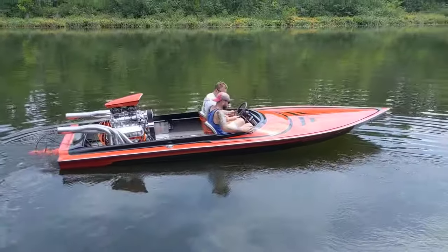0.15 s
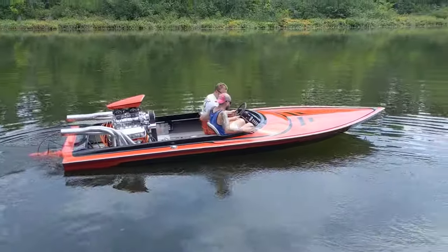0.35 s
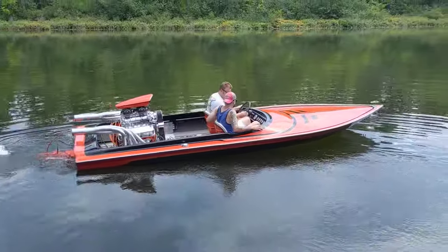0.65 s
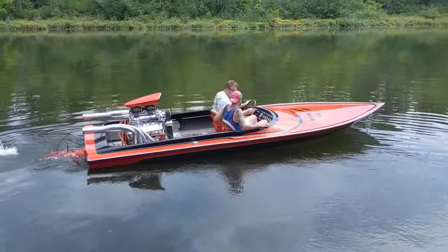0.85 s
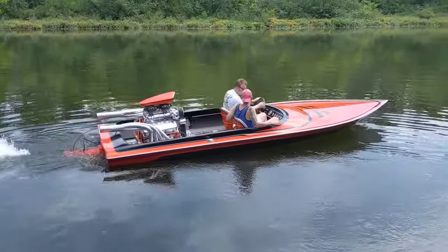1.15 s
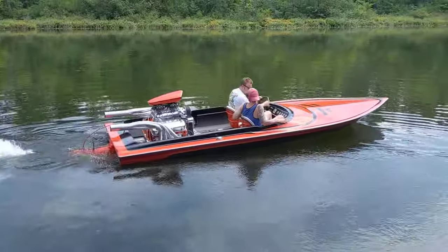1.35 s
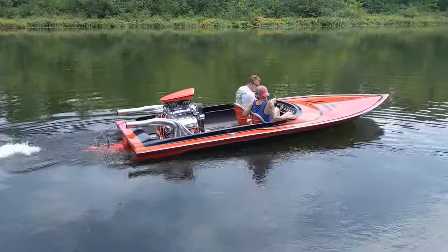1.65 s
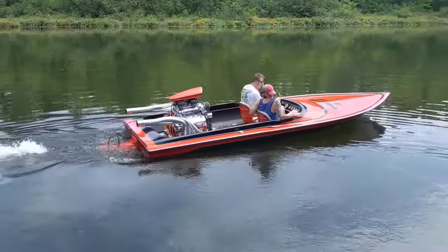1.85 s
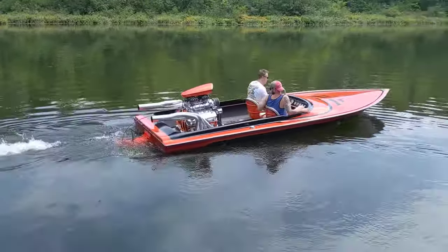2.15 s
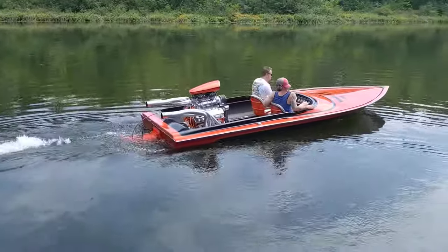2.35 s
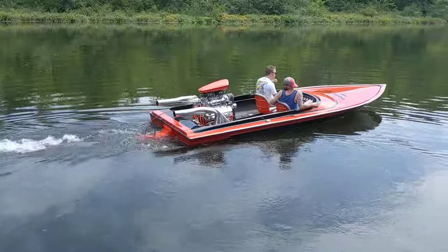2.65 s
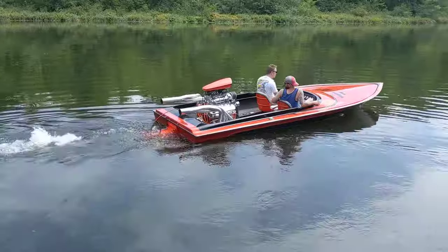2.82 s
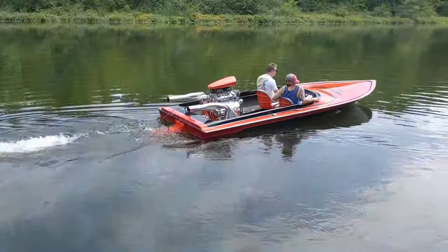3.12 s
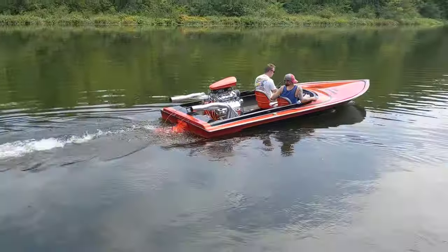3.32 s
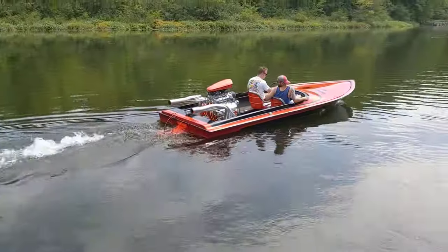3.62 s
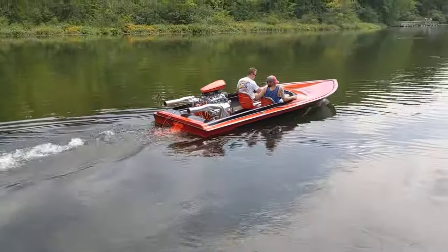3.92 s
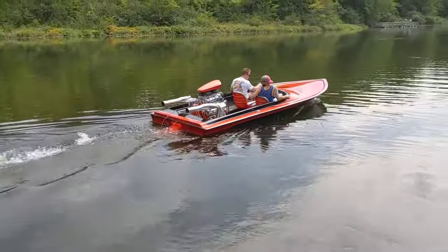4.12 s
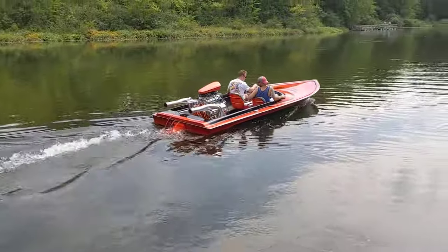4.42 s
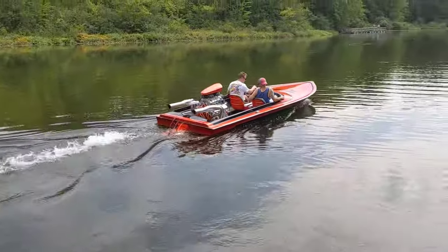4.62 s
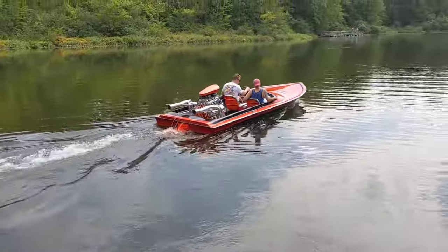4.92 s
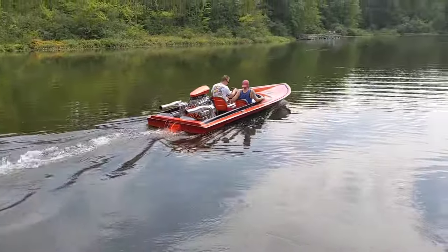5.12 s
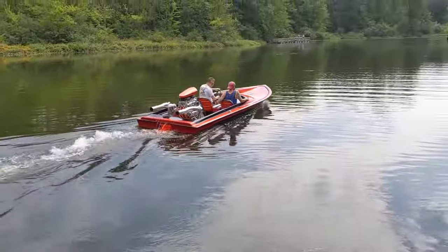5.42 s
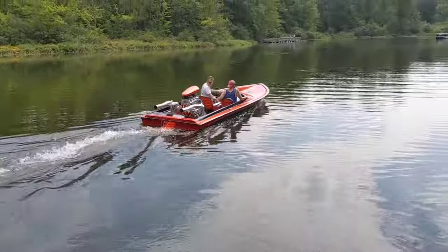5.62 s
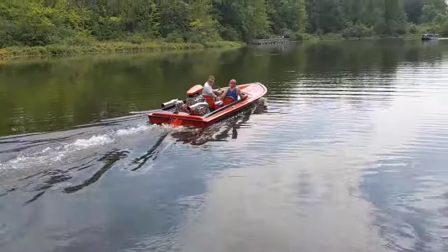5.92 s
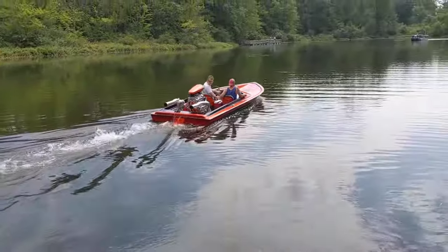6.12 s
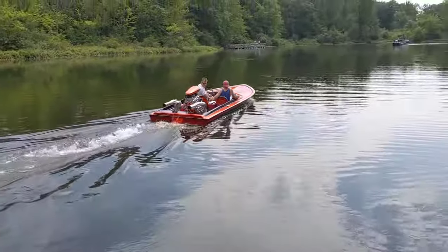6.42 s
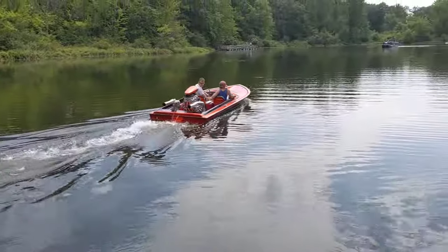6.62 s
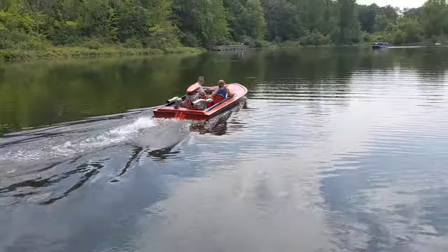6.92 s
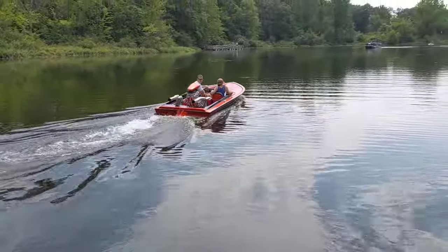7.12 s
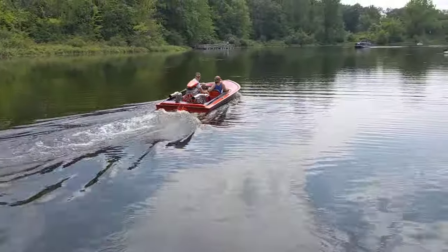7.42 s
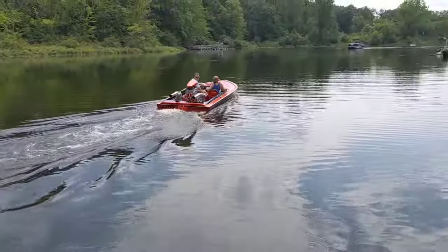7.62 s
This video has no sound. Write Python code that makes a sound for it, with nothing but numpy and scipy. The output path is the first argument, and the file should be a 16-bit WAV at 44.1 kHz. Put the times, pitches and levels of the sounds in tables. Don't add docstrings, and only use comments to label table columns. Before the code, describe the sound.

A powerful eight-cylinder speedboat engine idles throughout, already running at the start. Deep uneven hum and fast barking pops from open pipes, each with a raspy puff of gas. Speed wavers slightly but never revs up. As the stern swings toward the listener the tone changes and the cracks become harder and more frequent. Water jet washes beneath. Stereo pickup from the shore, open air, faint short echo from trees.

```python
import sys
import numpy as np
from scipy import signal
from scipy.fft import rfft, irfft, next_fast_len
from scipy.io import wavfile
from scipy.ndimage import uniform_filter1d, map_coordinates

SR = 44100
rng = np.random.default_rng(int(sys.argv[2]) if len(sys.argv) > 2 else 0)


def rack_gain(trim_db):
    fader = np.asarray(trim_db, float)
    return 10 ** (fader / 20)


def dump(signal):
    limited = np.clip(np.atleast_2d(signal).T, -1, 1)
    pcm = np.round(limited * 32767).astype(np.int16)
    wavfile.write(sys.argv[1], SR, pcm)


N = 342216

# time in seconds, firing rate in firings per second.
ENGINE_SPEED = [(0.0, 84.43), (0.38, 87.74), (0.55, 85.3), (0.95, 87.1), (1.43, 85.17), (1.66, 87.82),
                (2.47, 85.59), (2.69, 90.77), (3.15, 85.5), (3.46, 88.2), (3.68, 86.94), (4.65, 86.41),
                (4.75, 87.5), (5.64, 86.61), (5.86, 89.83), (6.06, 85.99), (6.75, 87.77), (7.76, 87.35)]
# multiple of the four-stroke cycle, level side-on in dB, level stern-on in dB.
CRANK_ORDERS = [(3, -51, -48), (4, -40, -61), (5, -21.5, -31), (6, -32.5, -32.5), (7, -29, -30.5),
                (7.96, -16, -17.5), (9, -37.5, -33), (10, -43, -43.5), (11, -33, -38), (12, -30.5, -41),
                (13, -43.5, -40.5), (14, -42.5, -35.5), (15, -31.5, -43), (16, -40.5, -42), (17, -36, -41),
                (18, -38.5, -43), (19, -32.5, -37), (20, -29.5, -33.5), (21, -19, -19.5), (22, -31, -36),
                (23, -52, -40.5), (24, -62, -36.5), (25, -38.5, -40), (26, -41, -40), (27, -47.5, -51.5),
                (28, -43, -57), (29, -57, -64), (30, -43.5, -50.5)]
# push in dB, push lag in firings, crack in dB, crack lag in firings.
CYLINDERS = [(4.9, .32, -2, .04), (.9, .22, -1, -.06), (.8, .74, -1, .13), (3, .65, -2, .13),
             (-10.9, .57, 1, -.06), (.5, .62, 0, .07), (1.6, .51, 1, -.06), (-.9, .43, -1, .01)]
# bark side-on in dB, bark stern-on in dB,
# mouth tone side-on in Hz, quarter-on in Hz, stern-on in Hz.
PIPES = [(-6, -5, 7500, 5700, 5500), (-3, -4, 3200, 7600, 2950), (-2, -8, 2700, 2700, 4500),
         (-7, -11, 5000, 9000, 8800), (-8, -4, 5000, 5500, 5500), (0, -11, 4000, 2700, 5300),
         (-9, 0, 9500, 3600, 4100), (-9, 0, 4500, 5500, 2700)]
BARK_LAG = [0, -.25, -.2, -.08, -.28, -.4, -.3, -.32]
# time in seconds, peak level in dB.
HARD_FIRINGS = [(2.0504, -14.5), (2.6391, -16), (2.7848, -15.5), (3.2078, -17), (4.3108, -16.5),
                (5.2083, -15), (5.3918, -17.5), (5.4846, -17.5), (5.5764, -21), (5.6468, -16),
                (5.8154, -15), (6.0314, -18.5), (6.0888, -16), (6.1237, -15), (6.1816, -15.5), (6.217, -16),
                (6.3217, -13.5), (6.4574, -13.5), (6.4928, -13.5), (6.5851, -17), (6.7907, -15),
                (6.8585, -16), (7.0416, -14), (7.4986, -13.5), (7.5544, -17), (7.5894, -13.5)]
# time in seconds, level in dB.
GAS_FLOW = [(0, -31), (1, -31.5), (2, -29.5), (3.2, -27.5), (4.3, -27.5), (5.2, -25.5), (5.72, -26.5),
            (5.85, -23.5), (6.45, -25.5), (6.8, -26), (7.76, -27)]
# time in seconds, stern-on share 0-1, quarter-on share 0-1.
HEADING = [
    (0, 0.01, 0),
    (1.5, .08, 0.14),
    (2.4, 0.18, 0.95),
    (3.5, 0.34, 0.9),
    (4.5, 0.85, 0.7),
    (5.5, 0.97, 0.38),
    (7.76, 0.95, 0.42),
]
# centre in Hz, width in Hz, level in dB.
PIPE_SIDE = [(412, 40, 3), (600, 40, -9), (700, 60, -7), (1047, 250, -9), (1660, 150, -21)]
PIPE_STERN = [(423, 33, -16.5), (595, 55, -6), (712, 36, 4), (810, 70, -7), (1840, 330, -24)]
# centre in Hz, width in Hz, level in dB.
MOUTH_SIDE = [(2490, 310, -8.5), (4010, 75, -2.5), (4720, 120, -1), (5840, 140, 14.5), (7420, 270, -3),
              (9610, 310, 2)]
MOUTH_STERN = [(2240, 360, 0.5), (4470, 246, 8.5), (5350, 260, -4.5), (6190, 360, 1.5), (8290, 210, -1),
               (9440, 290, -1.5), (10670, 190, -3), (11500, 260, -5)]
# frequency in Hz, level in dB per Hz.
GAS_SIDE = [(1060, -13), (1800, -9), (2240, -15), (2600, -4.5), (4430, 2.5), (4860, -2.5), (6580, -25),
            (7550, 2.5), (8200, -5), (14200, -13), (16200, -32)]
GAS_STERN = [(1060, -25), (1800, -15.5), (2090, -21), (2480, -0.5), (3950, -12), (4860, -10.5), (5380, -1),
             (6890, -8.5), (9950, -5.5), (14400, -4), (16200, -19)]
# frequency in Hz, gain in dB.
QUARTER_COLOUR = [(420, -1.5), (760, -6), (1100, -1), (1700, 7), (2200, -3), (3200, -2.5), (4150, -3.5),
                  (5600, -1.5), (6600, -5.5), (7500, 1.5), (12500, -2.5)]
# frequency in Hz, level in dB per Hz.
WASH_SIDE = [(180, -29), (300, -12), (370, -4), (433, -3.5), (500, -4), (703, -10.5), (1300, -11),
             (1900, -18.5), (4260, -13.5), (6580, -15.5), (7390, -17.5), (9500, -17.5), (14200, -26),
             (15400, -25), (16200, -92)]
WASH_STERN = [(180, -33), (300, 2), (487, -13.5), (715, 1), (903, -6.5), (1370, -24), (2080, -16.5),
              (2500, -3), (3320, -12), (4870, -26), (5380, -16.5), (7030, -29.5), (9980, -39.5),
              (13700, -45), (16200, -60)]
# frequency in Hz, level in dB per Hz.
HULL_RUMBLE = [(20, -21), (42, -6), (60, 10), (100, -18), (230, 10), (320, -22), (500, -43)]
# frequency in Hz, time to fall 60 dB in seconds.
SHORE_DECAY = [(200, 0.42), (2000, 0.13), (10000, 0.066)]
# frequency in Hz, left minus right in dB.
BALANCE_SIDE = [(60, 0.5), (92, 2), (140, -3), (210, 3), (330, 6), (500, 10.5), (770, 7.5), (1170, 7),
                (1790, 7.5), (2740, -0.5), (4190, 4), (6410, 8), (9810, 7.5), (15000, -1)]
BALANCE_STERN = [(60, 1.5), (92, -4), (140, -5), (210, 3.0), (330, -7), (500, 15), (770, 3.5), (1170, 7),
                 (1790, -1.5), (2740, 1), (4190, 4), (6410, 8), (9810, 4.0), (15000, -3)]
# frequency in Hz, phase in radians.
LEFT_LEADS = [(55, 0), (87, -0.5), (230, -1), (600, -1.4), (1000, -0.5), (1380, 1.74), (1720, 0.36),
              (3450, 1), (4130, -2.5), (5250, 0.5), (6030, 3), (9000, 5.5), (16000, 8)]
# frequency in Hz, likeness 0-1.
LIKENESS = [(60, .99), (500, 0.72), (1000, 1), (2000, 1), (4000, 0.33), (8000, 0.3), (14000, 0)]

BOOM_HZ, BOOM_WIDTH_HZ, BOOM_FLOOR = 229, 12, .04
LOPE_DB_PER_HZ = .9
STEP = 8
BARK_SIDE_DB, BARK_STERN_DB, BARK_HALFWAY_DB = -1.5, -6, -3.5
TONE_DB, TONE_WIDTH_HZ = 9, 330
TOP, KNEE = .9, 5


def firings():
    first_firing = -.28
    return first_firing + np.cumsum(curves(ENGINE_SPEED)[0]) / SR


def hum():
    push_db, lag = np.transpose(CYLINDERS)[:2]
    cycle = 2 * np.pi * firings()[::STEP] / 8
    rate = curves(ENGINE_SPEED)[0][::STEP] / 8
    mean_rate = rate.mean()
    share = stern_share()[::STEP]
    push_at = np.arange(8) + lag

    def boom(f):
        return BOOM_FLOOR + 1 / (1 + 2j * (f - BOOM_HZ) / BOOM_WIDTH_HZ)

    out = 0
    for k, side_db, stern_db in CRANK_ORDERS:
        k = round(k)
        train = -np.sum(rack_gain(push_db) * np.exp(-2j * np.pi * k * push_at / 8))
        weak = np.clip((-15 - side_db) / 25, .1, 1)
        lope_db = (k < 8) * LOPE_DB_PER_HZ * 8 * (rate - mean_rate)
        db = side_db + share * (stern_db - side_db) + lope_db + 2.8 * weak * wobble(6)[::STEP]
        angle = k * cycle + np.angle(train) + 0.44 * weak * wobble(5.8)[::STEP]
        pair = ports(k * mean_rate, BALANCE_SIDE)[:, None]
        slide = (boom(k * rate) / boom(k * mean_rate)) ** (1.94 * weak)
        tone = rack_gain(db) * np.exp(1j * angle) * slide
        out = out + np.sqrt(2) * (pair * tone).real / abs(pair.mean())
    return signal.resample_poly(out, STEP, 1, axis=1)[:, :N]


def pulses(lag, db, jitter, scatter_db, pop_db):
    count = firings()
    n = np.arange(int(count[-1]) - 1)
    chance = rng.standard_normal((len(n), 2))
    at = np.interp(n + lag[n % 8] + jitter * chance[:, 0], count, np.arange(N))
    size_db = db[n % 8] + scatter_db * np.clip(chance[:, 1], -2.5, 1.2)
    mean_peak_db = np.mean(HARD_FIRINGS, 0)[1]
    for s, peak_db in HARD_FIRINGS:
        size_db[np.argmin(abs(at - s * SR))] = pop_db + peak_db - mean_peak_db
    return np.bincount(at.astype(int), rack_gain(size_db), N)


def bark():
    lag, share = np.array(BARK_LAG), stern_share()
    side, stern = [unit(pulses(lag, db, jitter=.012, scatter_db=1.2, pop_db=-5))
                   for db in np.transpose(PIPES)[:2]]
    push = filtered((1 - share) * side + share * stern, lambda f: 1 / (1 + 1j * f / 700) ** 2)
    decay = rack_gain(-60 * np.arange(1500) / SR / 0.045)
    puff = signal.fftconvolve(push, decay)[:N]
    drive = unit(push) + .75 * unit(puff) * noise_pair()
    ring = turned(drive, lambda f: modes(PIPE_SIDE, f), lambda f: modes(PIPE_STERN, f))
    aim_db = BARK_SIDE_DB + share * (BARK_STERN_DB - BARK_SIDE_DB)
    aim_db = aim_db + BARK_HALFWAY_DB * np.sin(np.pi * share)
    return rack_gain(curves(GAS_FLOW)[0] + aim_db) * ring


def cracks():
    db, lag = np.transpose(CYLINDERS)[2:]
    t = np.arange(1500) / SR
    burst = (1 - np.exp(-(t / 0.00082) ** 2)) * rack_gain(-60 * t / 0.028)
    train = pulses(lag, db, jitter=0.021, scatter_db=1.5, pop_db=4.0)
    gate = signal.fftconvolve(train, burst)[:N]
    puffs = patched(gate * noise_pair(), size=256, wide=3, long=3, patchy_db=3.2,
                    lift_db=mouth_tones(size=256))

    def side(f):
        return rack_gain(along(GAS_SIDE, f)) * (0.59 + abs(modes(MOUTH_SIDE, f)))

    def stern(f):
        return rack_gain(along(GAS_STERN, f)) * (0.26 + abs(modes(MOUTH_STERN, f)))

    return rack_gain(curves(GAS_FLOW)[0] - 1.5) * turned(puffs, side, stern)


def mouth_tones(size):
    hz, t = signal.stft(np.zeros(N), SR, nperseg=size)[:2]
    at = np.minimum((t * SR).astype(int), N - 1)
    stern, quarter = np.clip(curves(HEADING), 0, 1)[:, at]
    cylinder = np.floor(firings()[at] + .25).astype(int) % 8
    tones_hz = np.array(PIPES)[cylinder, 2:].T
    shares = [(1 - stern) * (1 - quarter), quarter, stern * (1 - quarter)]
    return sum(TONE_DB * s * np.exp(-((hz[:, None] - c) / TONE_WIDTH_HZ) ** 2)
               for s, c in zip(shares, tones_hz))


def wash():
    patchy = patched(noise_pair(), size=512, wide=6, long=10, patchy_db=2.92)
    rush = turned(patchy, lambda f: rack_gain(along(WASH_SIDE, f)), lambda f: rack_gain(along(WASH_STERN, f)))

    def hull(f):
        return rack_gain(along(HULL_RUMBLE, f))

    rush = rack_gain(-32.5 + 0.24 * wobble(3.15)) * rush
    return rush + rack_gain(-35 + 2.0 * wobble(1.02)) * turned(noise_pair(), hull, hull)


def shore(x):
    hz, t, z = signal.stft(rng.standard_normal((2, SR // 2)), SR, nperseg=256)
    decay = rack_gain(-60 * t / along(SHORE_DECAY, hz)[:, None])
    tail = signal.istft(z * decay, SR, nperseg=256)[1]
    return signal.fftconvolve(x, tail / np.linalg.norm(tail[0]), axes=1)[:, :N]


def turned(x, side, stern):
    share = stern_share()
    a = filtered(x, lambda hz: side(hz) * ports(hz, BALANCE_SIDE))
    b = filtered(x, lambda hz: stern(hz) * ports(hz, BALANCE_STERN))
    return np.sqrt(1 - share) * a / a.mean(0).std() + np.sqrt(share) * b / b.mean(0).std()


def stern_share():
    return np.clip(curves(HEADING)[0], 0, 1)


def ports(hz, balance):
    half = rack_gain(along(balance, hz) / 2) * np.exp(.5j * along(LEFT_LEADS, hz))
    return np.array([half, 1 / half])


def noise_pair():
    def mix(hz):
        angle = np.arccos(np.clip(along(LIKENESS, hz), 0, 1)) / 2
        return np.array([np.cos(angle), np.sin(angle)])

    mid, side = filtered(rng.standard_normal((2, N)), mix)
    return np.array([mid + side, mid - side])


def modes(table, f):
    return sum((-1) ** k * rack_gain(db) * 1j * f * w / (c * c - f * f + 1j * f * w)
               for k, (c, w, db) in enumerate(table))


def patched(x, size, wide, long, patchy_db, lift_db=0):
    z = signal.stft(x, nperseg=size)[2]
    field = uniform_filter1d(rng.standard_normal(z.shape[1:]), int(wide), 0)
    field = uniform_filter1d(field, int(long), 1)
    gain_db = lift_db + 2 * patchy_db * np.tanh(unit(field) / 2)
    return signal.istft(z * rack_gain(gain_db), nperseg=size)[1][:, :N]


def filtered(x, response):
    m = next_fast_len(N + SR // 2)
    return irfft(rfft(x, m) * response(np.fft.rfftfreq(m, 1 / SR)), m)[..., :N]


def wobble(rate):
    at = np.arange(0, N + 64, 64)
    knots = rng.standard_normal(int(N * rate / SR) + 4)
    return np.interp(np.arange(N), at, map_coordinates(knots, [at * rate / SR]))


def curves(rows):
    s, *cols = np.transpose(rows)
    return [np.interp(np.arange(N) / SR, s, c) for c in cols]


def along(points, hz):
    f, v = np.transpose(points)
    return np.interp(np.log(hz + 1), np.log(f + 1), v)


def unit(x):
    return x / np.sqrt(np.mean(x ** 2) + 1e-20)


def scene():
    exhaust = bark() + cracks()
    near = exhaust + rack_gain(-16.5) * shore(exhaust) + wash()
    quarter = np.clip(curves(HEADING)[1], 0, 1)
    coloured = filtered(near, lambda f: rack_gain(along(QUARTER_COLOUR, f)))
    return hum() + (1 - quarter) * near + quarter * coloured


def low_pass(x):
    return signal.sosfilt(signal.butter(12, 16490, fs=SR, output="sos"), x)


def record(dry):
    limited = dry / (1 + abs(dry / TOP) ** KNEE) ** (1 / KNEE)
    return low_pass(limited)


dry = scene()
out = record(dry)
dump(out)
```